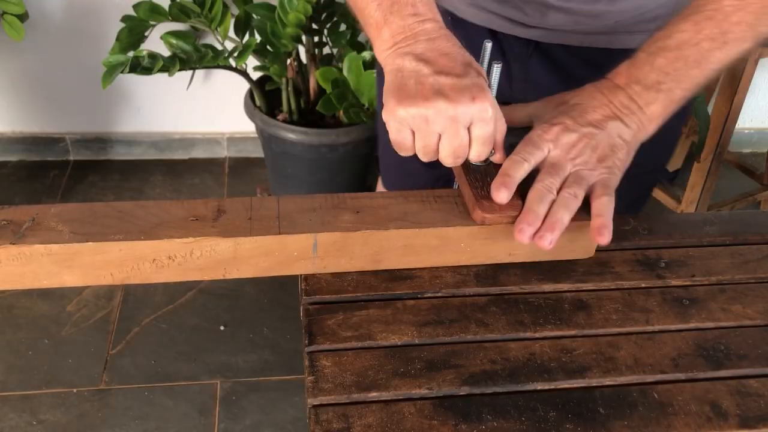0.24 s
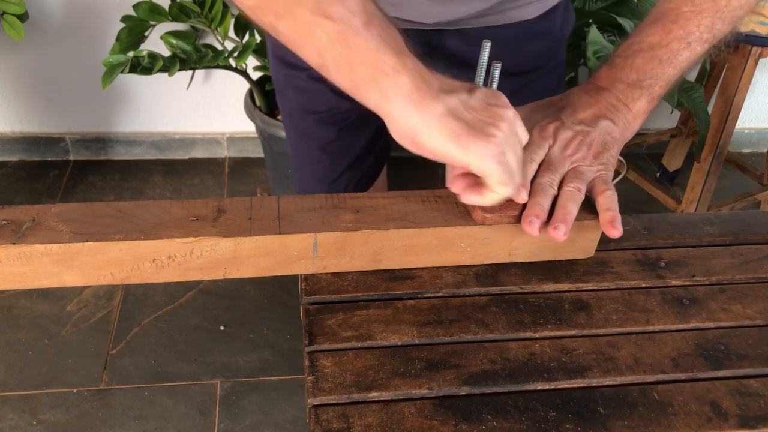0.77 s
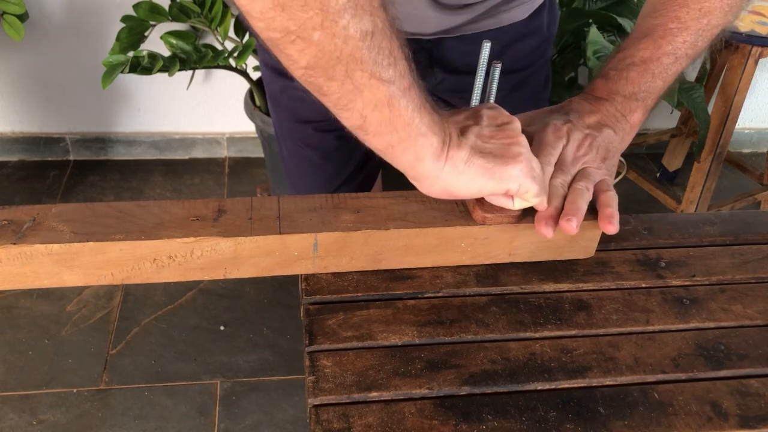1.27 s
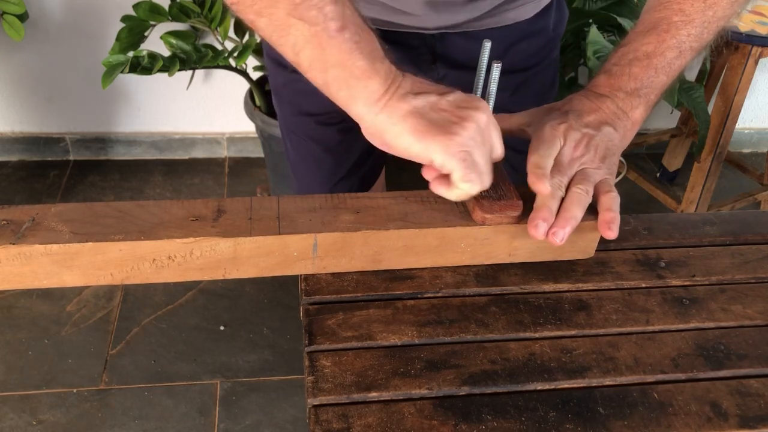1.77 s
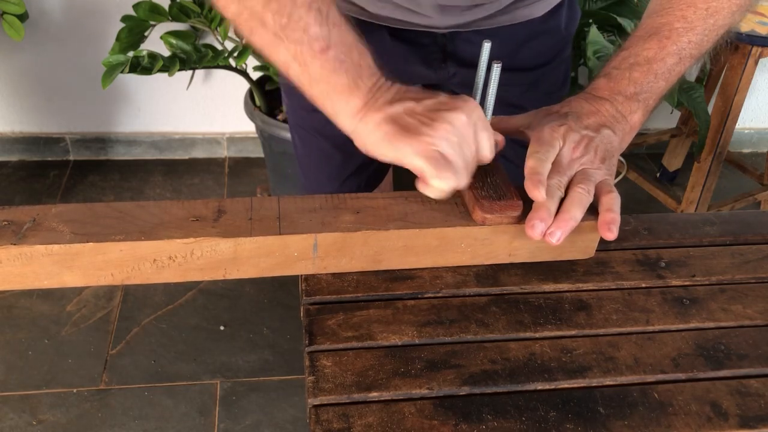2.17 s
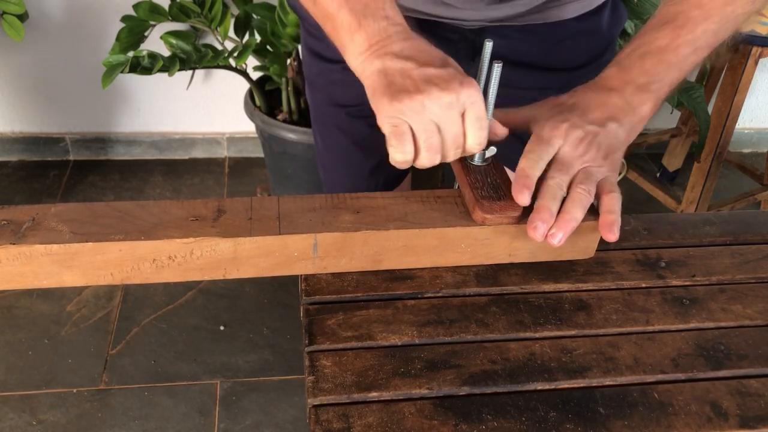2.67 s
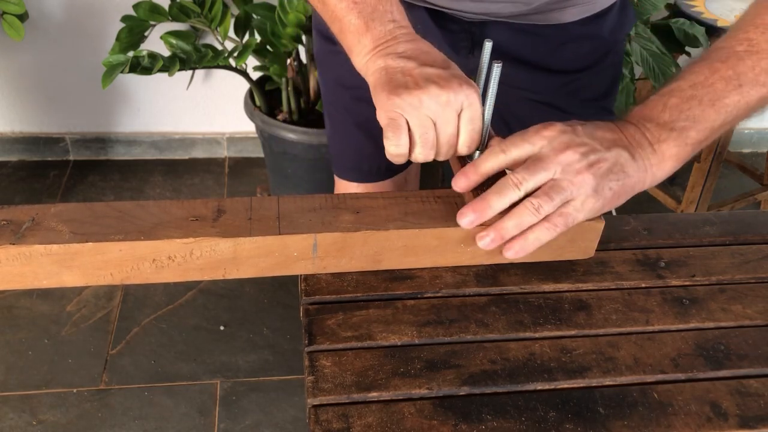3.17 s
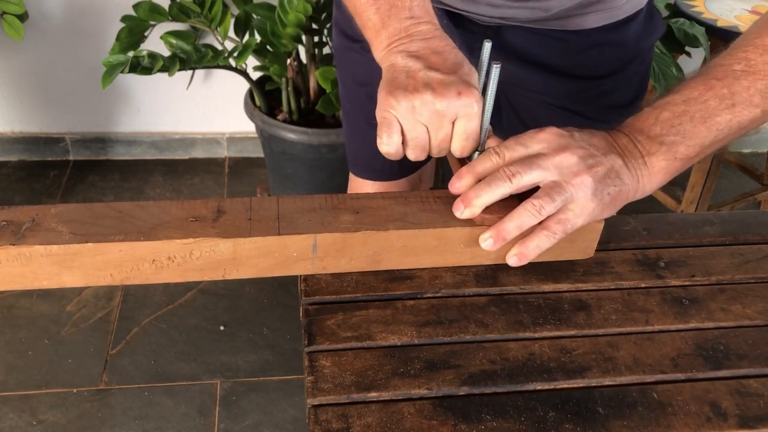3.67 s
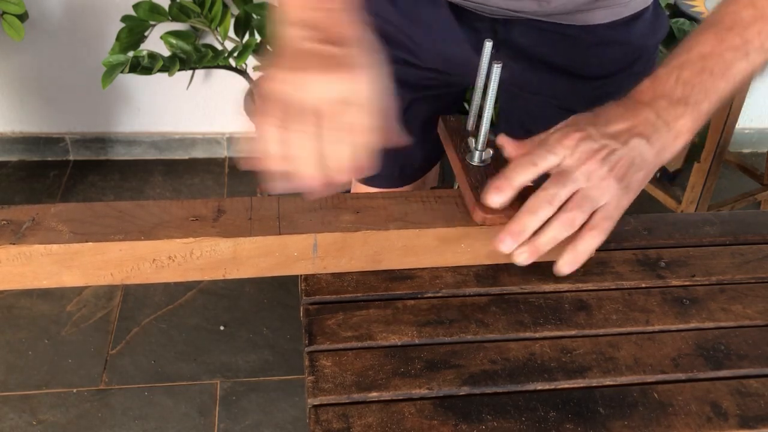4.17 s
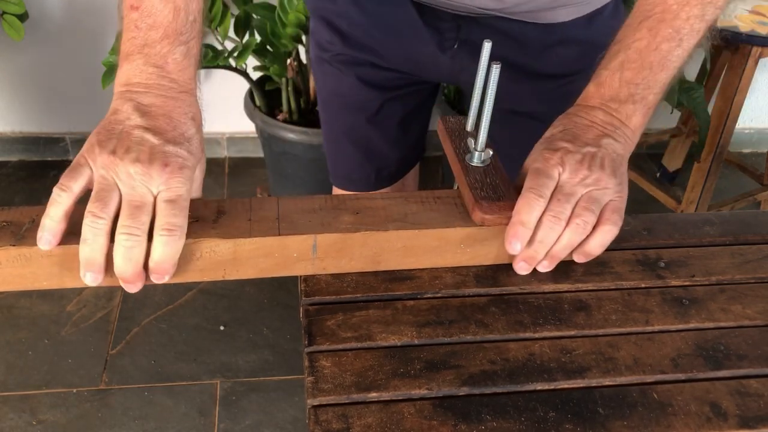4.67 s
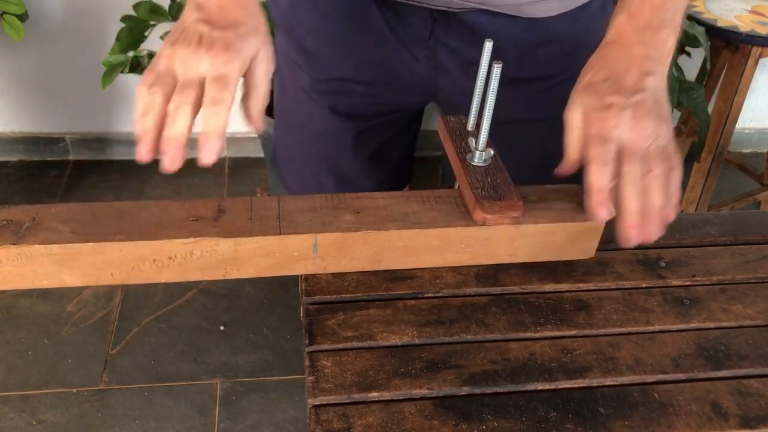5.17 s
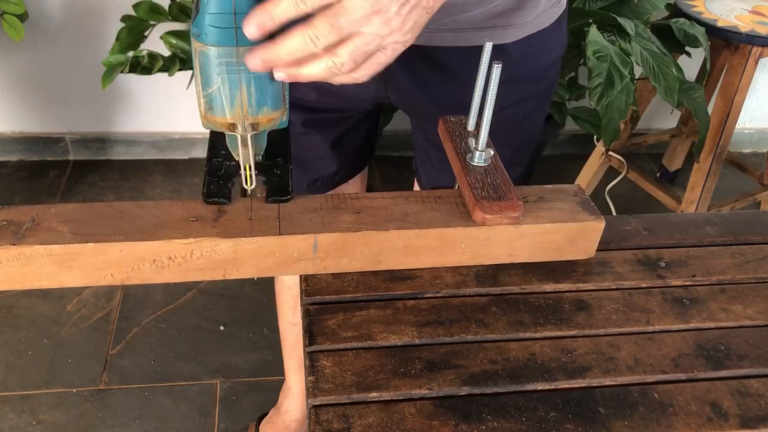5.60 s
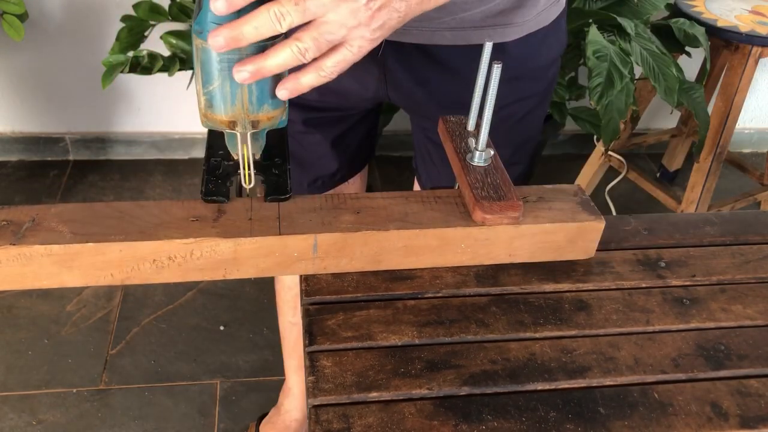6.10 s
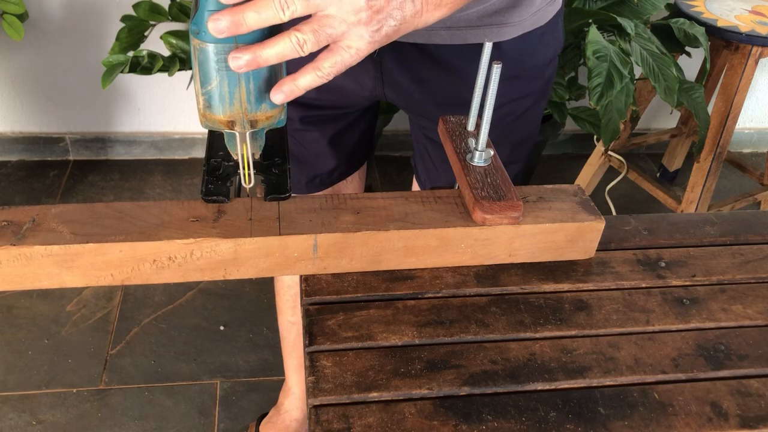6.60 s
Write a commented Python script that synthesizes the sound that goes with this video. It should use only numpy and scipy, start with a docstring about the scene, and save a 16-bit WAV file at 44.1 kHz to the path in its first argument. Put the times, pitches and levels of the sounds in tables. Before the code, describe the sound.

Soft wooden knocks, bolt clinks and thread creaks from a clamp being tightened, until a jigsaw is set down and rattles up to speed.

```python
"""A tiled work corner, one microphone hearing the bench and the short echo of the walls.
Hands tighten a wing-nut clamp on a wooden beam: they brush the wood, the block knocks, the bolt rings
and the thread creaks. An electric jigsaw is set on the beam, shuffled into place and switched on;
its gear and plunger rattle up to full speed, far louder than all the rest.
Further off, outside, faint birds whistle over a soft bed of outdoor air."""
import sys
import numpy as np
from scipy import signal
from scipy.fft import rfft, irfft
from scipy.io import wavfile
from scipy.ndimage import uniform_filter1d

SR = 44100
rng = np.random.default_rng(int(sys.argv[2]) if len(sys.argv) > 2 else 0)


def wrap_up_sound(samples):
    """Save the sound to the file named by the first command line argument, as 16-bit audio."""
    columns = np.atleast_2d(samples).T
    # keep every value between -1 and 1, then stretch to whole-number steps
    tamed = np.clip(columns, -1, 1)
    steps = np.round(tamed * 32767).astype(np.int16)
    wavfile.write(sys.argv[1], SR, steps)


N = 302085
T = np.arange(N) / SR

# spectrum of the air outside: freq_hz, level_db
AIR_SPECTRUM = [(20, -52), (35, -8), (60, -5), (120, 1), (200, -5.5), (400, -7), (550, -12.5),
                (1200, -15.5), (2000, -21), (3500, -23.5), (6000, -27.5), (9000, -30.5), (15000, -28.5)]
# birds outside: start_s, length_s, held pitch_hz, slide_share, waver_share (of the pitch), level_db
BIRD_WHISTLES = [(2.478, 0.14, 3290, 0.026, .012, -69.5), (4.845, 0.1, 3305, 0.25, .008, -64),
                 (5.304, 0.13, 1195, .05, .09, -68)]

# hand movements at the bench: middle_s, length_s, level_db
HAND_BRUSHES = [(0.19, 0.18, -52.5), (0.65, 0.18, -52.5), (1.34, 0.15, -67), (2.29, 0.14, -68.5),
                (3.46, 0.16, -66)]  # over wood and cloth
FINGER_SLIDES = [(2.92, 0.21, -74), (3.14, 0.074, -71), (3.275, .04, -67), (3.515, 0.022, -65),
                 (3.66, 0.23, -73), (3.87, 0.068, -70), (4.11, 0.062, -70), (4.25, 0.023, -74),
                 (4.385, 0.056, -66), (4.96, 0.065, -66.5), (5.66, 0.24, -66.5)]  # on the wood and the saw
BLOCK_PUSHES = [(1.355, 0.13, -50), (1.475, 0.056, -56)]  # the block judders across the beam
# their spectra: freq_hz, level_db
BRUSH_SPECTRUM = [(530, -45), (900, -4.5), (1030, -3.5), (1390, -6), (1810, -3), (3000, -2), (4630, -0.5),
                  (12100, -7.5), (15100, -4), (16000, -7.5)]
FINGER_SPECTRUM = [(2000, -6), (5000, -3), (9000, -8), (12000, -2), (15000, -7)]
JUDDER_SPECTRUM = [(53, -40), (90, -6.5), (206, -1), (389, -14.5), (463, -22), (530, -15), (606, -17),
                   (779, -16.5), (1290, -25), (4950, -31.5), (9000, -48), (11700, -78)]

# wooden knocks of the clamp block: start_s, peak_db, thump_db, crack_db, table_db
BLOCK_KNOCKS = [(0.084, -44.5, -44, -68, -54), (0.355, -51.5, -59, -63.5, -66), (1.463, -39, -50, -54, -57),
                (1.793, -50, -46.5, -64, -57.5), (1.946, -54, -47.5, -71.5, -63),
                (2.083, -40, -41, -40, -47.5), (2.447, -40.5, -45.5, -51.5, -56),
                (3.289, -57, -46.5, -67, -59), (4.661, -43.5, -36, -57, -66), (4.768, -68, -51.5, -90, -66)]
# jolts of the steel bolt: start_s, peak_db, thump_db, crack_db
BOLT_JOLTS = [(0.9326, -44.5, -45.5, -65), (1.068, -44.5, -46, -68), (1.5908, -53.5, -50.5, -79.5),
              (2.5507, -52, -49, -78.5), (3.472, -48, -49.5, -60), (3.918, -41.5, -43, -46.5),
              (4.4977, -46.5, -45, -48)]
# loudest slips of the thread: start_s, tick_db, thump_db
THREAD_SLIPS = [(3.5455, -54, -53), (3.6214, -50, -47.5), (3.6444, -53, -48), (3.6913, -55.5, -48),
                (3.734, -53.5, -49), (3.7683, -52, -46.5), (3.7886, -56, -47.5), (3.8221, -53, -50),
                (3.8501, -48, -46.5), (3.891, -54, -49.5)]
# turns of the nut that make the table groan: middle_s, length_s, level_db
NUT_TURNS = [(3.5, 0.13, -57), (3.72, 0.24, -56.5), (4.05, .07, -60.5)]
# modes of beam, block and bolt: pitch_hz, level_db, t60_s
BEAM_MODES = [(154.4, -4.5, 0.18), (191, -12.5, 0.54), (307, -2, 0.06), (348, 1, 0.12), (412.5, 2, 0.079),
              (458, -7.5, 0.12), (608, -3, 0.077)]
BLOCK_MODES = [(733, 1, .05), (858, 0, 0.045), (1020, 8, 0.023), (1170, 5, 0.014), (1405, -1, 0.03),
               (1616, -3, 0.025), (1930, -5.5, 0.03)]
BOLT_MODES = [(641, 2, 0.22), (726, -24, 0.23), (840, -17, 0.2), (1016, 2.5, 0.15), (1026, -5.5, 0.3),
              (1074, -1, 0.25), (1290, -10, 0.18), (1560, -14, 0.2), (1512, -0.5, 0.24), (1723, -7, 0.21),
              (1970, -6, 0.22), (2540, -13, 0.17)]
# spectra around the clamp: freq_hz, level_db
CRACK_SPECTRUM = [(900, -6), (1500, 3), (2000, -7), (2600, 0.5), (3600, -11), (5000, -11), (6500, -20.5),
                  (8500, -31), (16000, -33)]  # the contact
TABLE_SPECTRUM = [(30, -15), (65, 1), (110, 3), (200, -2), (400, -3.5), (520, -3), (640, -13.5), (900, -15),
                  (1300, -10), (2000, -21.5), (4000, -26.5), (7000, -52)]  # the table under the beam
RATTLE_SPECTRUM = [(60, -3), (160, 9), (400, 3), (650, 4), (1100, 0), (1700, -6.5), (2600, -13.5),
                   (3500, -16), (5500, -50), (9000, -55)]  # loose parts
TICK_SPECTRUM = [(1800, -7), (2800, -6), (3500, -1.5), (4000, 0), (4600, -9), (5400, -12), (7000, -20),
                 (16000, -36)]  # the slipping thread

# shoves of the saw's shoe along the beam: middle_s, length_s, level_db
SHOE_SHOVES = [(5.545, 0.066, -48), (5.625, 0.073, -48), (5.78, 0.17, -51.5), (5.91, 0.095, -57)]
# taps of the shoe, then the trigger click: start_s, level_db
STEEL_TAPS = [(5.5237, -48), (5.5346, -38), (5.6104, -42), (5.714, -43), (5.983, -38.5)]
# spectra of the saw: freq_hz, level_db
SCRAPE_SPECTRUM = [(70, -26), (130, -9), (220, 1.5), (350, -5.5), (700, -6), (1000, -4.5), (1750, -4),
                   (2550, -2.5), (2850, -7.5), (3900, -4.5), (4400, -12.5), (6000, -10.5), (7500, -22),
                   (16000, -28)]  # shoe on wood
CLICK_SPECTRUM = [(200, -18), (900, -7), (2500, 1), (4000, 3), (5000, -7), (8000, -8), (11000, -17),
                  (15000, -21)]  # steel taps
HOUSING_SPECTRUM = [(60, -29), (130, -20.5), (260, -13.5), (500, -9.5), (750, -7), (950, -3), (1250, -6.5),
                    (1800, -4.5), (2500, -2.5), (3000, -4), (3900, -4), (4500, -4.5), (7000, -13),
                    (15000, -24.5)]  # gear housing
RUSH_SPECTRUM = [(300, -25), (2500, -22), (4800, -5), (6000, -0.5), (7400, -1.5), (9000, -5),
                 (10500, -10.5), (16000, -12.5)]  # motor brushes and fan
SIZZLE_SPECTRUM = [(8000, -29), (11000, -6.5), (12800, 1), (14100, -5), (14700, 1), (15700, -0.5)]  # blade
# resonances of shoe, gear case and blade: pitch_hz, width_hz, level_db
SHOE_RESONANCES = [(1390, 140, -1), (1620, 33, 0), (2570, 110, -1), (3120, 73, -4), (3850, 150, -3),
                   (4570, 100, -11)]
CASE_RESONANCES = [(980, 200, -20), (1494, 190, -4), (2230, 720, -15), (2540, 130, -2.5), (3150, 170, -0.5),
                   (3440, 320, -1.5), (3814, 144, 0)]
BLADE_RESONANCES = [(11100, 82, 3), (11500, 57, -10), (14000, 190, -8), (14600, 700, 2.5)]
# whines of gear teeth and commutator: cycles_per_stroke, width_hz, level_db at top speed
MOTOR_WHINES = [(43.34, 92, -32), (320, 900, -33)]

SWITCH_ON_S, FREE_STROKES_HZ, HALF_SPEED_S = 5.983, 59.3, 0.1
GEAR_DB, RUSH_DB, SIZZLE_DB = -27, -23, -24
GUIDE_HZ, GUIDE_WIDTH_HZ, GUIDE_DB = 2200, 176, 1.3  # blade guide resonance
RASP_SPEED, RASP_HALF_WIDTH = 0.795, 0.12  # shares of top speed
SHAKE_HZ, SHAKE_HALF_WIDTH_HZ, SHAKE_DB, HUM_DB = 50.3, 1.3, -42, -54


def undb(db):
    """Decibels to gain."""
    return 10 ** (np.asarray(db) / 20)


def unit(x):
    """Scale to rms 1."""
    return x / np.sqrt(np.mean(x ** 2))


def noise():
    """White noise over the whole scene."""
    return rng.standard_normal(N)


def swell(middle_s, length_s, db, steepness=4.4):
    """Gain that rises, holds around its middle and falls."""
    return undb(db) / (1 + np.abs(2 * (T - middle_s) / length_s) ** steepness)


def swells(rows):
    """A series of swells, added in power."""
    return np.sqrt(sum(swell(*row) ** 2 for row in rows))


def colour(x, spectrum):
    """Minimum-phase filter with unit power gain, shaped like the spectrum."""
    hz, db = np.transpose(spectrum)
    size = 8192
    bins_hz = np.fft.rfftfreq(size, 1 / SR)
    log_gain = np.log(undb(np.interp(np.log(bins_hz + 1), np.log(hz), db)))
    cepstrum = irfft(log_gain)[:size // 2]
    cepstrum[1:] *= 2
    response = irfft(np.exp(rfft(cepstrum, size)))[:size // 2]
    return signal.fftconvolve(x, response / np.linalg.norm(response))[:len(x)]


def resonate(x, peaks):
    """Drive resonances side by side and sum them."""
    return sum(undb(db) * signal.lfilter(*signal.iirpeak(hz, hz / width_hz, SR), x)
               for hz, width_hz, db in peaks)


def fade(t60, length_s=0.5):
    """Exponential decay, 60 dB down after t60 seconds."""
    return undb(-60 * T[:int(length_s * SR)] / t60)


def ring(modes):
    """One blow on a set of modes, peak 1; each lands on a slightly different spot."""
    out = 0
    for hz, db, t60 in modes:
        mode = fade(t60) * np.sin(2 * np.pi * hz * T[:SR // 2])
        out = out + undb(db + rng.standard_normal()) * mode * rng.choice([-1, 1])
    return out / np.abs(out).max()


def burst(spectrum, t60):
    """Coloured noise that dies away."""
    envelope = fade(t60)
    return colour(envelope * rng.standard_normal(len(envelope)), spectrum)


def add(track, start_s, sound):
    """Mix a sound into the track."""
    start = int(start_s * SR)
    track[start:start + len(sound)] += sound[:N - start]


def friction(rate_hz, spread_db):
    """Tiny slips at random times, rms 1."""
    slips = (rng.random(N) < rate_hz / SR) * rng.choice([-1, 1], N)
    return unit(slips * undb(spread_db * np.clip(noise(), -2, 2)))


def outdoor_air(level_db=-62.5):
    """A soft, steady bed of low noise from outside."""
    return colour(noise(), AIR_SPECTRUM) * undb(level_db)


def birds(slide_s=0.024):
    """Faint whistles from outside that slide up and hold, some thin, some hoarse."""
    out = 0
    for start_s, length_s, hz, depth, waver, db in BIRD_WHISTLES:
        slide = 1 - depth * np.exp(-np.maximum(T - start_s, 0) / slide_s)
        pitch_hz = hz * slide * (1 + waver * unit(uniform_filter1d(noise(), size=200)))
        envelope = swell(start_s + slide_s + length_s / 2, length_s, db)
        out = out + envelope * np.sin(2 * np.pi * np.cumsum(pitch_hz) / SR)
    return out


def hands():
    """Fine friction of hand and fingertips, and coarse stick-slip of the block being pushed round."""
    brush = colour(friction(rate_hz=14000, spread_db=5), BRUSH_SPECTRUM) * swells(HAND_BRUSHES)
    fingers = colour(friction(rate_hz=3400, spread_db=0), FINGER_SPECTRUM) * swells(FINGER_SLIDES)
    judder = colour(friction(rate_hz=1300, spread_db=0), JUDDER_SPECTRUM) * swells(BLOCK_PUSHES)
    return brush + fingers + judder


def clamp():
    """The block knocks on the beam, the bolt rings when it jolts, the thread creaks in single slips."""
    out = np.zeros(N)
    for start_s, peak_db, thump_db, crack_db, table_db in BLOCK_KNOCKS:
        add(out, start_s, undb(peak_db) * ring(BLOCK_MODES))
        add(out, start_s + 0.0028, undb(thump_db) * ring(BEAM_MODES))
        add(out, start_s, undb(crack_db) * burst(CRACK_SPECTRUM, t60=0.028))
        # the table under the beam answers later and longer
        add(out, start_s + 0.0042, undb(table_db) * burst(TABLE_SPECTRUM, t60=0.22))
    for start_s, peak_db, thump_db, crack_db in BOLT_JOLTS:
        add(out, start_s, undb(peak_db) * ring(BOLT_MODES))
        add(out, start_s, undb(crack_db) * burst(CRACK_SPECTRUM, t60=0.12))
        # the loose block settles on the beam just after the bolt
        add(out, start_s + 0.01183, undb(thump_db) * ring(BEAM_MODES))
        add(out, start_s, undb(thump_db - 5.5) * burst(RATTLE_SPECTRUM, t60=0.34))
    for start_s, tick_db, thump_db in THREAD_SLIPS:
        add(out, start_s, undb(tick_db) * burst(TICK_SPECTRUM, t60=0.022))
        add(out, start_s, undb(thump_db) * (ring(BEAM_MODES) + undb(1.1) * ring(BLOCK_MODES)))
    # finer slips between the loud ones make the table groan
    return out + colour(friction(rate_hz=1800, spread_db=4), TABLE_SPECTRUM) * swells(NUT_TURNS)


def saw_handling():
    """The steel shoe taps down and scrapes along the grain, ringing as it goes; the trigger clicks."""
    scrape = colour(friction(rate_hz=4600, spread_db=2.5), SCRAPE_SPECTRUM)
    touching = T > STEEL_TAPS[0][0]
    out = unit(scrape + resonate(scrape, SHOE_RESONANCES)) * swells(SHOE_SHOVES) * touching
    for start_s, db in STEEL_TAPS:
        add(out, start_s, undb(db) * burst(CLICK_SPECTRUM, t60=0.026))
    return out


def beam_shake(strokes, rate_hz, speed):
    """The plunger's inertia shakes the beam, most as the stroke rate passes its resonance."""
    detuning = (rate_hz - SHAKE_HZ) / SHAKE_HALF_WIDTH_HZ
    sway = undb(SHAKE_DB) * np.sin(2 * np.pi * strokes) / np.hypot(1, detuning)
    hum = undb(HUM_DB) * sum(np.sin(2 * np.pi * harmonic * strokes) for harmonic in (2, 3, 4))
    return speed ** 2 * (sway + hum)


def motor_whine(strokes):
    """Gear teeth and commutator: rough tones locked to the stroke, fluttering in strength and phase."""
    out = 0
    for cycles, width_hz, db in MOTOR_WHINES:
        lowpass = signal.butter(2, width_hz / 2, fs=SR, output="sos")
        flutter = signal.sosfilt(lowpass, noise() + 1j * noise())
        out = out + undb(db) * unit(np.real(flutter * np.exp(2j * np.pi * cycles * strokes)))
    return out


def blows(strokes, pattern_db=(-0.8, -3.5, -4.5, 1.3), scatter_db=2.5, jitter_s=0.00059):
    """Four blows per stroke as a part takes up its play, each a little early or late."""
    due = np.flatnonzero(np.diff(np.floor(len(pattern_db) * strokes)))
    size_draw, time_draw = np.clip(rng.standard_normal((len(due), 2)), -1.5, 1.5).T
    landed = np.clip(due + (jitter_s * SR * time_draw).astype(int), 0, N - 1)
    hits = np.zeros(N)
    hits[landed] = undb(np.resize(pattern_db, len(due)) + scatter_db * size_draw)
    return hits


def chatter(hits, t60, steady):
    """Each blow sets off a short spray of contacts over steady sliding; the mean power stays at 1."""
    envelope = np.hypot(signal.fftconvolve(hits, fade(t60))[:N], steady)
    return noise() * envelope / np.sqrt(uniform_filter1d(envelope ** 2, size=3000) + 1e-9)


def gear_rattle(hits, speed):
    """Blows ring the gear case, which rasps most at one speed; housing and blade guide grow with speed."""
    housing = colour(chatter(hits, t60=0.024, steady=0.38), HOUSING_SPECTRUM)
    rasp = 1 + 0.83 / (1 + ((speed - RASP_SPEED) / RASP_HALF_WIDTH) ** 2)
    case = resonate(housing, CASE_RESONANCES)
    guide = resonate(housing, [(GUIDE_HZ, GUIDE_WIDTH_HZ, GUIDE_DB)])
    return (0.68 + 0.45 * speed) * housing + rasp * case + speed ** 6 * guide


def jigsaw():
    """The motor spins up: the gear rattles, brushes and fan rush, the blade sizzles, the beam shakes."""
    # the motor pulls hard from rest, then creeps towards its free-running speed
    running_s = np.maximum(T - SWITCH_ON_S, 0)
    rate_hz = FREE_STROKES_HZ * running_s / (running_s + HALF_SPEED_S)
    strokes = np.cumsum(rate_hz) / SR
    speed = rate_hz / rate_hz.max()
    hardness = 0.5 + 0.15 * speed  # slow gears mostly slide; the blows harden with speed
    gear_hits, plunger_hits, blade_hits = (hardness * blows(strokes) for _ in range(3))
    gear = gear_rattle(gear_hits, speed)
    rush = colour(chatter(plunger_hits, t60=0.048, steady=0.64), RUSH_SPECTRUM)
    sizzle = colour(chatter(blade_hits, t60=0.0061, steady=0.63), SIZZLE_SPECTRUM)
    sizzle = sizzle + resonate(sizzle, BLADE_RESONANCES)
    # each part grows by its own power of speed
    clatter = (undb(GEAR_DB) * speed ** 0.61 * gear
               + undb(RUSH_DB) * speed ** 1.59 * rush
               + undb(SIZZLE_DB) * speed ** 2.4 * sizzle
               + speed ** 3.7 * motor_whine(strokes))
    return clatter, beam_shake(strokes, rate_hz, speed)


def room(x, wet_db, t60, treble_t60, split_hz=3500):
    """Direct sound, then after 5 ms a short tail off walls and tiles; the treble has its own decay."""
    low = signal.sosfilt(signal.butter(2, split_hz, fs=SR, output="sos"), noise()[:SR])
    high = signal.sosfilt(signal.butter(2, split_hz, "high", fs=SR, output="sos"), noise()[:SR])
    tail = (low * fade(t60, 1) + undb(-6) * high * fade(treble_t60, 1)) * (T[:SR] > 0.005)
    return x + undb(wet_db) * signal.fftconvolve(x, tail / np.linalg.norm(fade(t60, 1)))[:N]


def scene():
    """The corner as the one microphone hears it, both channels alike."""
    clatter, shake = jigsaw()
    small_sounds = room(clamp() + hands() + saw_handling() + birds(), wet_db=-3, t60=0.68, treble_t60=0.73)
    saw = room(clatter, wet_db=-8, t60=0.73, treble_t60=0.34) + shake
    return np.tile(outdoor_air() + small_sounds + saw, (2, 1))


def record(dry):
    """The recorder cuts the top steeply."""
    top_hz = 15750
    return signal.sosfilt(signal.ellip(16, 0.1, 80, top_hz, fs=SR, output="sos"), dry)


dry = scene()
out = record(dry)
wrap_up_sound(out)
```